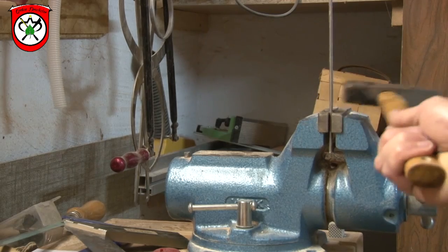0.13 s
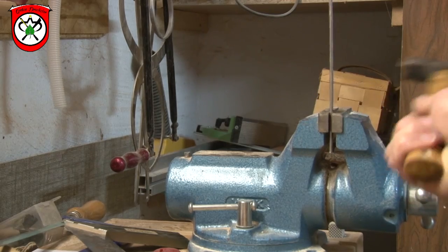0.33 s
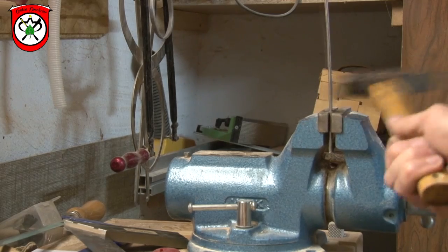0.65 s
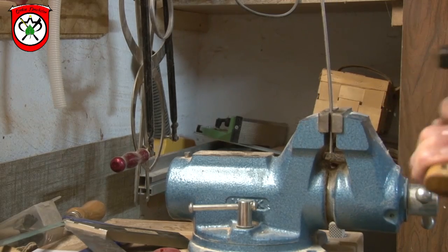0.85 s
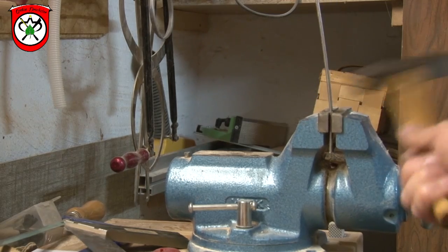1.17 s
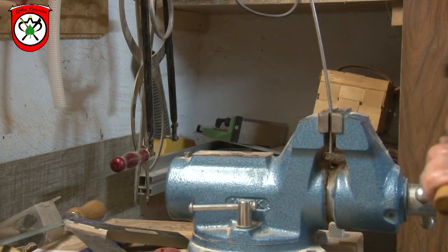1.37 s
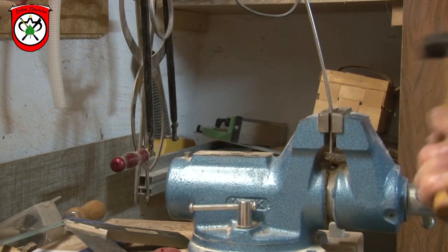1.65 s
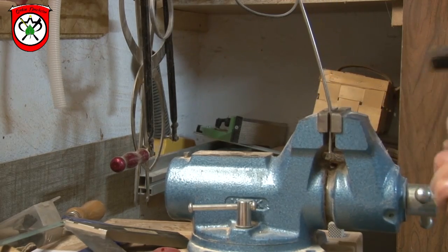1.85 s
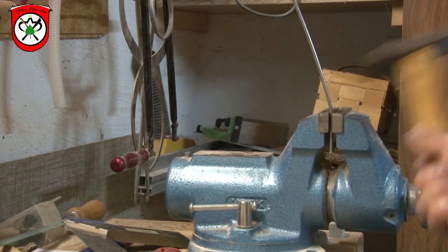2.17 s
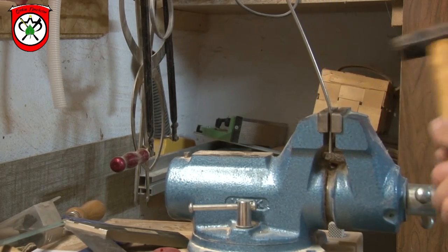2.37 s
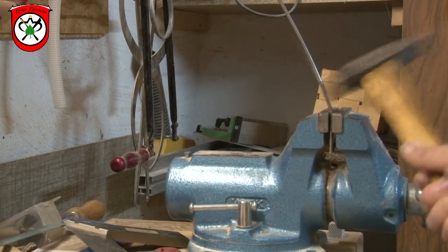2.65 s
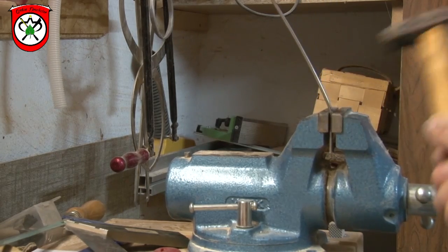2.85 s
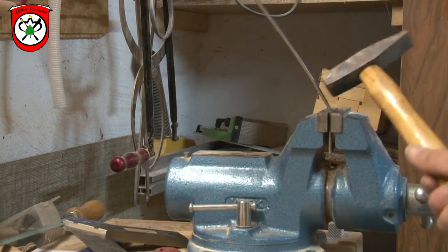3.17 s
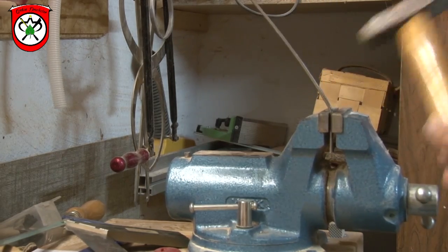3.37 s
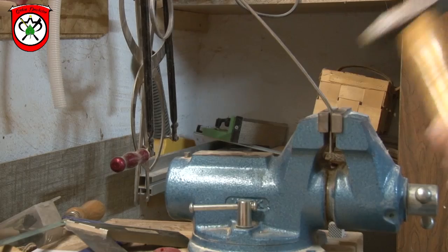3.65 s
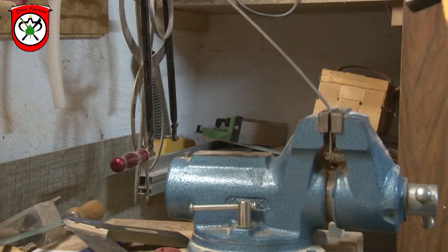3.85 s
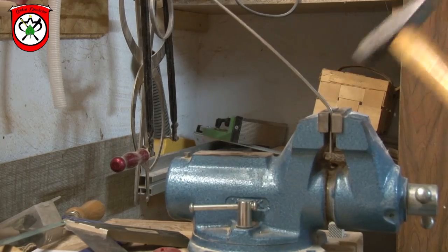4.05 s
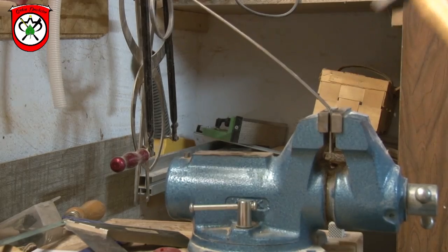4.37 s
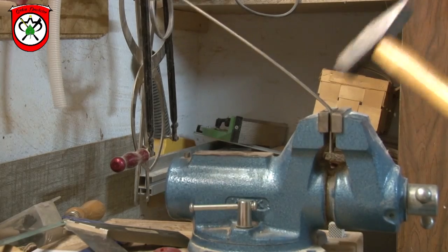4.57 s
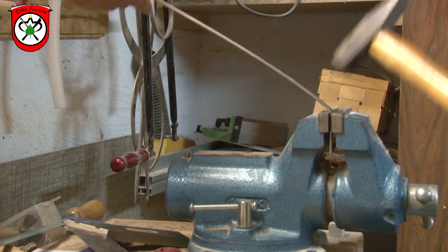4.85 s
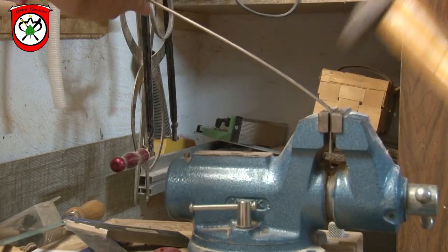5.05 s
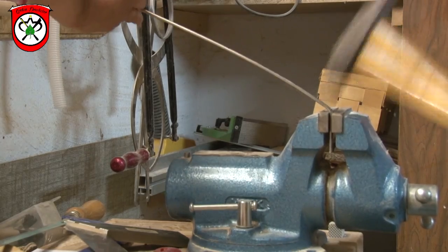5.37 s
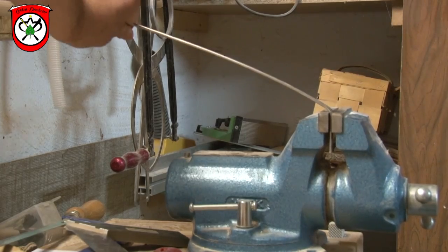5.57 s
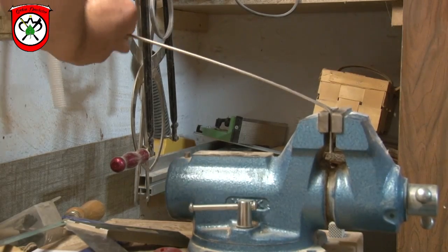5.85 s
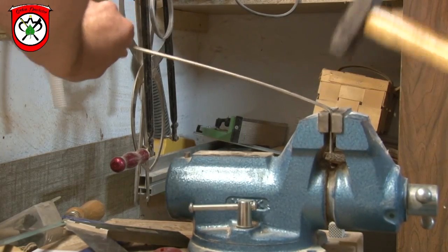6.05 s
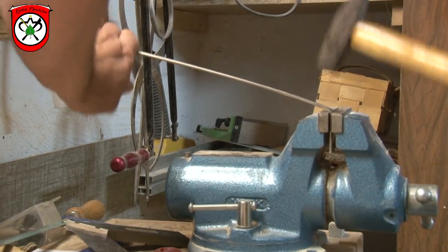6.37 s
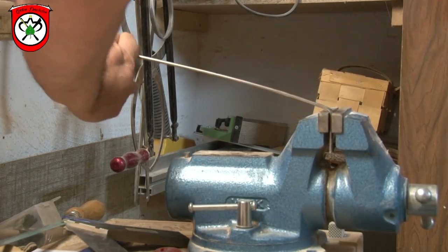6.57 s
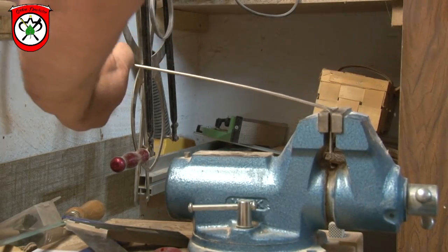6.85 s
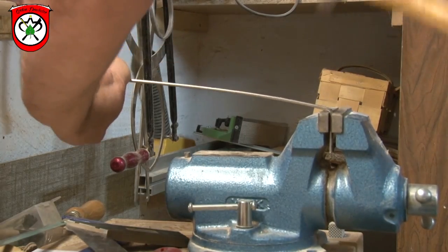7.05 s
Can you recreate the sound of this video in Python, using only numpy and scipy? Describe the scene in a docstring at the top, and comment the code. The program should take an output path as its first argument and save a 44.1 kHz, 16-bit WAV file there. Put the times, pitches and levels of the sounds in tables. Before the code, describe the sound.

A hammer strikes a thin steel rod in a heavy bench vise, sharp even blows with ticks, short pings, solid knocks and rattling tools.

```python
"""In a small workshop, a hammer bends a thin steel rod over the jaws of a bench vise in an even run of blows.
Each blow bends it a few degrees: a steel tick, a short ping of the rod, a knock of vise and bench,
then a rattle of loose tools. Hits are damped modes and coloured noise bursts; tools chatter and clink between.
The first blows land sideways on the free rod, which whips and pings; the last ones come from above
and drive it onto the jaw. Each sound is heard directly and from the walls, over faint room air."""
import sys
import numpy as np
from scipy import signal
from scipy.fft import rfft, irfft, next_fast_len
from scipy.io import wavfile
from scipy.ndimage import uniform_filter1d

SR = 44100
rng = np.random.default_rng(int(sys.argv[2]) if len(sys.argv) > 2 else 0)


def waveform_to_disk(signal):
    """Save audio, clipped to [-1, 1], as 16-bit WAV at the path in sys.argv[1]."""
    frames = np.transpose(np.atleast_2d(signal))
    scaled = np.clip(frames, -1, 1) * 32767
    samples = np.round(scaled).astype(np.int16)
    wavfile.write(sys.argv[1], SR, samples)


N = 318402
AGE = np.arange(next_fast_len(int(.6 * SR))) / SR   # seconds since a hit, over the life of one blow
ATTACK = int(.03 * SR)   # samples over which a hit's loudness is set
BEND_DEG_PER_BLOW = 3.012   # the rod's angle from upright sets the character of the next blow

# hammer blows, levels relative: start_s, weight_db, contact_tick_db, rod_ping_db
BLOWS = [(0.193, -9.5, -26, -37.5), (0.479, -7.5, -24, -38.5), (0.75, -9, -25, -31),
         (1.024, -8.5, -26.5, -32), (1.282, -14, -28, -27.5), (1.55, -11, -26.5, -28),
         (1.805, -15, -26, -27.5), (2.06, -13.5, -26.5, -23.5), (2.291, -13.5, -24.5, -31),
         (2.518, -14, -23.5, -26.5), (2.752, -11.5, -24.5, -26.5), (2.989, -8.5, -23, -31.5),
         (3.24, -12, -22.5, -36.5), (3.506, -13.5, -24.5, -35), (3.78, -9, -22, -42),
         (4.034, -9.5, -22.5, -46), (4.319, -11, -23.5, -38), (4.613, -9, -23, -45),
         (4.887, -8, -22, -40.5), (5.176, -9, -24.5, -43), (5.476, -7, -26, -41), (5.76, -6.5, -26.5, -38),
         (6.077, -9, -28, -38), (6.41, -6, -26.5, -35), (6.735, -5.5, -26.5, -33),
         (7.054, -5.5, -27.5, -34)]
# colour of a bright metallic crack: frequency_hz, relative level_db
CRACK_COLOUR = [(1200, -22), (2200, -7), (2700, 2.5), (3200, -1), (3700, -7.5), (5000, -13.5),
                (9000, -43.5)]


def from_db(db):
    """Decibels to gain."""
    return 10 ** (np.asarray(db) / 20)


def at_hz(points, hz):
    """Read a (frequency, value) table on a log-frequency axis."""
    f, value = np.transpose(points)
    return np.interp(np.log(np.maximum(hz, 1)), np.log(f), value)


def colour(x, points):
    """Filter x by a curve of (frequency_hz, gain_db) points."""
    size = x.shape[-1]
    hz = np.fft.rfftfreq(size, 1 / SR)
    return irfft(rfft(x) * from_db(at_hz(points, hz)), size)


def noise(points, size):
    """Steady coloured noise of rms 1."""
    x = colour(rng.standard_normal(size), points)
    return x / x.std()


def dying(t60):
    """Exponential decay, 60 dB down after t60 seconds, over the life of one blow."""
    return np.exp(-np.log(1000) * AGE / t60)


def unit(x):
    """Scale to rms 1 over the attack."""
    return x / np.sqrt(np.mean(x[:ATTACK] ** 2) + 1e-20)


def even(x):
    """Spectrum of x with its chance peaks levelled: dense modes overlap and favour no narrow band."""
    spectrum = rfft(x)
    local_power = uniform_filter1d(np.abs(spectrum) ** 2, size=21, axis=-1)
    return spectrum / np.sqrt(local_power + 1e-20)


def add(out, s, x):
    """Mix x into out from time s."""
    i = max(int(s * SR), 0)
    out[i:i + len(x)] += x[:max(len(out) - i, 0)]


def struck(modes, scatter_db, contact_s, detune):
    """Damped modes of a struck body; strength and pitch vary at random from hit to hit."""
    out = 0
    for k, (hz, db, t60) in enumerate(modes):
        strength, shift = np.clip(rng.standard_normal(2), -1.5, 1.5)
        polarity = (-1) ** (k // 4)   # flips after every four modes
        wave = polarity * np.sin(2 * np.pi * hz * (1 + detune * shift) * AGE)
        out = out + from_db(db + scatter_db * strength) * wave * dying(t60)
    onset = 1 - np.exp(-AGE / contact_s)
    return unit(out * onset)


def crowd(points, t60, contact_s):
    """Modes too many and too damped to tell apart: a short noise burst, cut off at t60."""
    burst = irfft(even(rng.standard_normal(len(AGE)) * dying(t60)), len(AGE))
    onset = 1 - np.exp(-AGE / contact_s)
    return unit(colour(burst, points) * onset * (AGE < t60))


def room_air():
    """Still air of the room: independent quiet noise in the two channels."""
    # mostly low hush: frequency_hz, relative level_db
    air_colour = [(20, -2), (100, 4.5), (210, 2), (500, -15), (1500, -11.5), (4000, -6), (16000, -36)]
    return from_db(-82) * np.array([noise(air_colour, N), noise(air_colour, N)])


def rod_state(deg):
    """Three shares 0-1 at this angle: how much the rod whips, is hit from above and lies on the jaw."""
    whip = np.exp(-((deg - 18.1) / 17.3) ** 2)   # the free rod whips most around 18 degrees
    # the rod is taken in hand and the blows start to come from above
    overhead = (1 + np.tanh((deg - 56) / 2)) / 2
    # the rod comes to lie on the jaw
    seated = (1 + np.tanh((deg - 69.3) / 2.5)) / 2
    return whip, overhead, seated


def shaking():
    """Gain of the chatter: each blow shakes the bench, most when the rod whips, and it dies away."""
    out = np.zeros(N)
    add(out, 0, from_db(-52) * dying(.16))   # tools still settling at the start
    for k, (s, *_) in enumerate(BLOWS):
        whip, overhead, _ = rod_state(k * BEND_DEG_PER_BLOW)
        level_db = -63 + 14.5 * whip - 11 * overhead
        add(out, s, from_db(level_db) * dying(.96))
    return out


def chatter(per_s, touch_t60):
    """Hanging tools tap against each other while the bench shakes: noise driven by random taps."""
    # colour of the taps: frequency_hz, relative level_db
    chatter_colour = [(100, -17.5), (230, 7), (450, 3.5), (750, 4), (1300, -5), (1800, 0), (2350, -21),
                      (2560, -10.5), (2800, -19), (3700, -25), (7000, -21.5), (14000, -44.5)]
    taps = (rng.random(N) < per_s / SR) * rng.exponential(1, N)
    # energy decays twice as fast in dB as the amplitude taken from it
    energy = np.abs(signal.fftconvolve(taps, dying(touch_t60 / 2))[:N])
    x = colour(rng.standard_normal(N) * np.sqrt(energy), chatter_colour)
    return shaking() * x / x.std()


def clinks(t60):
    """Light metal touches: a tiny click and a few close, quickly damped modes."""
    # loose things touching between the blows: start_s, peak level_db before the echo, nominal pitch_hz
    touches = [(.103, -59, 7500), (.699, -52, 1900), (.968, -56, 1900), (1.503, -48, 1900),
               (1.771, -48, 1900), (1.938, -45, 4200), (2.251, -50, 1700), (2.885, -49, 1800),
               (3.191, -60, 2400), (3.435, -62, 2400), (4.013, -51, 1900)]
    out = np.zeros(N)
    for s, db, hz in touches:
        modes = [(hz * .91, -4, t60), (hz, 0, t60), (hz * 1.1, -6, t60)]
        x = struck(modes, scatter_db=2, contact_s=.002, detune=.005)
        x = x + from_db(-10) * crowd(CRACK_COLOUR, t60=.025, contact_s=.001)
        add(out, s, from_db(db) * x / np.abs(x).max())
    return out


def response(deg, weight_db, tick_db, ping_db):
    """How a blow is shared out: side blows shake bench and tools, blows from above go into the vise."""
    whip, overhead, seated = rod_state(deg)
    return dict(
        buzz_t60=.13 + .056 * whip - .048 * overhead - .035 * seated,
        rocking_db=-16.5 + 2 * whip - 1.5 * overhead,   # relative to the thud
        # the bench follows only a share of the weight
        thud=.61 * weight_db - 20.5 - .0575 * deg - 2 * overhead,
        knock=weight_db - 19.5 + 3.5 * overhead - 3 * seated,
        ring=weight_db - 21 - 3.5 * overhead,
        clack=weight_db - 19 + overhead + 1.5 * seated,
        clank=tick_db - 17 + 5 * overhead,
        ping=ping_db - 6 - 7.5 * overhead,   # the hand on the rod damps it
        tick=tick_db - 7 + 1.67 * overhead,
        loose=-28 - .2617 * deg - 2.5 * overhead)


def steel_contact(tick, ping, clank):
    """Steel meets steel: a bright tick, the high modes of the rod and a clank of the hammer head."""
    # contact tick: frequency_hz, relative level_db
    tick_colour = [(1500, -9), (3500, -11.5), (5000, -2), (6400, 2.5), (8000, -0.5), (9800, -2.5),
                   (11500, 2), (13000, -2), (15000, -16), (17000, -17.5)]
    # rod and jaw plates: pitch_hz, relative level_db, t60_s
    rod = [(6790, -9, .03), (6960, -8, .04), (7910, -10, .05), (8320, -8, .04), (9060, -4, .025),
           (9155, 0, .055)]
    # hammer head: pitch_hz, relative level_db, t60_s
    head = [(4150, -2, .025), (4250, 0, .03), (4360, -2, .03)]
    # jaw plates, with a faint ring of steel tools nearby: pitch_hz, relative level_db, t60_s
    tools = [(1780, -2, .05), (1949, -40, 1.0), (2552, -34, .7), (2650, 4, .06), (2945, -1, .07),
             (3451, -33, .5)]
    out = np.zeros(len(AGE))
    add(out, 0, from_db(tick - 1.5) * crowd(tick_colour, t60=.036, contact_s=.0005))
    add(out, 0, from_db(ping) * struck(rod, scatter_db=1.5, contact_s=.0003, detune=.002))
    add(out, .001, from_db(clank) * struck(head, scatter_db=0, contact_s=.0012, detune=.02))
    add(out, 0, from_db(tick - 14.5) * struck(tools, scatter_db=3, contact_s=.002, detune=.002))
    return out


def vise_knock(buzz_t60, tick, clack, knock, ring):
    """The jaws crack and clack and the heavy vise knocks in dense bursts; its few low modes ring."""
    # clack of the jaws: frequency_hz, relative level_db
    clack_colour = [(120, -49.5), (450, -21), (800, 1), (1200, -4), (1700, -2.5), (2100, -11), (3500, -26),
                    (9000, -45)]
    # low knock of the vise: frequency_hz, relative level_db
    knock_colour = [(50, -53.5), (150, -21.5), (280, -10.5), (450, 3.5), (600, 5), (760, -7), (1100, -22.5),
                    (3000, -54)]
    # vise on its mount: pitch_hz, relative level_db, t60_s
    vise = [(435.4, -15, 0.17), (509, -5.5, 0.1), (585, 10, 0.025), (749.6, -9.5, 0.075), (1176, -2, 0.028)]
    out = np.zeros(len(AGE))
    # the crack grows with both the hardness and the weight of the blow
    crack = (clack + tick) / 2 - 6.5
    add(out, .0005, from_db(crack) * crowd(CRACK_COLOUR, t60=buzz_t60, contact_s=.0026))
    add(out, .0007, from_db(clack - 2) * crowd(clack_colour, t60=buzz_t60, contact_s=.002))
    add(out, .001, from_db(knock) * crowd(knock_colour, t60=buzz_t60, contact_s=.00074))
    add(out, .0015, from_db(ring) * struck(vise, scatter_db=4, contact_s=.016, detune=.03))
    return out


def bench_thud(thud, rocking_db):
    """The wooden top thuds in its low modes while the whole bench rocks lower still."""
    # wooden bench top: pitch_hz, relative level_db, t60_s
    bench = [(172, -15.5, 0.31), (196.1, 3.5, 0.13), (211.9, 1.5, 0.13), (250.5, 5, 0.1),
             (284.1, -4.5, 0.16), (308.7, 0.5, 0.15), (353.6, -5.5, 0.25), (414, -7, 0.067)]
    # the whole bench rocking: pitch_hz, relative level_db, t60_s
    rocking = [(85.7, -11.5, 0.32), (110.9, -2, 0.26), (132.1, -1, 0.19)]
    out = np.zeros(len(AGE))
    add(out, .001, from_db(thud - 2.5) * struck(bench, scatter_db=.5, contact_s=.0078, detune=.025))
    add(out, .001, from_db(thud + rocking_db) * struck(rocking, scatter_db=1.4, contact_s=.001, detune=.034))
    return out


def rattle(flight_s, spread_s, touch_t60, count=30):
    """Loose tools jump with the blow and land in a flurry of small touches."""
    # colour of the landing tools: frequency_hz, relative level_db
    rattle_colour = [(60, -36), (300, -11.5), (700, 14), (1700, 12.5), (2400, 5), (5000, 1), (7000, 1.5),
                     (9500, -6), (12000, -4.5), (16000, -39)]
    energy = np.zeros(len(AGE))
    for when, size in rng.uniform(-.91, 1, (count, 2)):
        add(energy, flight_s + spread_s * when, from_db(4.2 * size) * dying(touch_t60 / 2))
    x = colour(rng.standard_normal(len(AGE)) * np.sqrt(energy), rattle_colour)
    return x / np.sqrt(np.sum(x ** 2) / ATTACK)


def blow(buzz_t60, rocking_db, thud, knock, ring, clack, clank, ping, tick, loose):
    """The steel contact sounds first; vise and bench follow within milliseconds, then loose tools."""
    out = steel_contact(tick, ping, clank)
    out = out + vise_knock(buzz_t60, tick, clack, knock, ring)
    out = out + bench_thud(thud, rocking_db)
    return out + from_db(loose) * rattle(flight_s=.024, spread_s=.018, touch_t60=.057)


def overtones(deg, weight_db):
    """A hanging tool sings while the whipping rod shakes the bench; at the end the rod slaps on the jaw."""
    # hanging steel tool: pitch_hz, relative level_db, t60_s
    hanging_tool = [(2510, 0, .9), (2585, 1, .9), (2945, -7, .7)]
    # rod pressed flat on the jaw: pitch_hz, relative level_db, t60_s
    jaw = [(770, -1, .04), (1055, 2.5, .04), (1184, 1, .04), (1460, -2.5, .03), (1826, -7, .03)]
    whip, _, seated = rod_state(deg)
    chime = from_db(-60.5) * struck(hanging_tool, scatter_db=4, contact_s=.02, detune=.001)
    slap = from_db(weight_db - 19.5) * struck(jaw, scatter_db=1, contact_s=.0013, detune=.027)
    return whip ** 2 * chime + seated * slap


def sparkle(x, top_db):
    """Raise or lower the highest treble: a slope from 8.5 kHz, full from 14 kHz."""
    padded = np.pad(x, ATTACK)   # keeps the filter from wrapping round the ends
    return colour(padded, [(8500, 0), (14000, top_db)])[ATTACK:-ATTACK]


def workshop(x, near, first_s=.0012, build_s=.001):
    """Add the stereo echo of the small room: reflections thicken, then die band by band."""
    # what the walls give back: frequency_hz, level_db
    wall_colour = [(80, -7), (200, -4.5), (500, -10.5), (1000, -7.5), (2000, -5.5), (4500, -4),
                   (7000, -4.5), (10000, -8.5), (15000, -19.5)]
    # how long the room rings: frequency_hz, t60_s
    room_t60 = [(100, .3), (500, .26), (2000, .26), (5000, .23), (9000, .19), (15000, .13)]
    # strength of the sideways reflections: frequency_hz, level_db
    sideways = [(120, -11), (280, -3), (600, -1.5), (1500, 0), (4000, 0), (8000, -7), (14000, -13)]
    size = len(AGE)
    hz = np.fft.rfftfreq(size, 1 / SR)
    centres = np.geomspace(100, 16000, 7)
    white = rfft(rng.standard_normal((2, size)))
    tail = 0
    for centre, one_band in zip(centres, np.eye(len(centres))):
        band = irfft(white * at_hz(np.c_[centres, one_band], hz), size)
        tail = tail + band * dying(at_hz(room_t60, centre))
    swell = 1 - np.exp(-np.maximum(AGE - first_s, 0) / build_s)
    mid, side = irfft(even(tail * swell) * from_db(at_hz(wall_colour, hz)), size)
    side = colour(from_db(-7.5) * side + from_db(-7) * near, sideways)
    walls = np.array([mid + side, mid - side]) * (AGE < .35)
    return x + signal.fftconvolve(x[None], walls, axes=-1)[:, :len(x)]


def hammering(near):
    """The run of blows, each with its own freshly drawn diffuse room echo."""
    out = np.zeros((2, N))
    for k, (s, weight_db, tick_db, ping_db) in enumerate(BLOWS):
        deg = k * BEND_DEG_PER_BLOW
        hit = blow(**response(deg, weight_db, tick_db, ping_db))
        hit = hit + overtones(deg, weight_db)
        # the highest treble dulls as the rod leans over
        hit = sparkle(hit, top_db=.5 - .0458 * deg)
        for channel, x in zip(out, workshop(hit, near)):
            add(channel, s, x)
    return out


def near_reflections():
    """The shelf and the near wall answer within milliseconds: a short, dense burst for the sides."""
    burst = rng.standard_normal(len(AGE)) * dying(.02) * (AGE > .0015)
    return irfft(even(burst), len(AGE))


def scene():
    """Everything on the bench, heard directly and from the walls, over still room air."""
    near = near_reflections()
    touches = clinks(t60=.03) + chatter(per_s=400, touch_t60=.05)
    air = room_air()
    return hammering(near) + workshop(touches, near) + air


def record(dry):
    """The two microphones differ a little in colour; deep bass and the top are cut."""
    # microphone pair: frequency_hz, left_minus_right_db
    balance = [(60, -6.5), (170, 0.8), (350, -1.5), (700, 0.5), (1400, 0.5), (2800, 1), (5600, 0.8),
               (12000, 0.2)]
    pair = []
    for x, sign in zip(dry, (1, -1)):
        pair.append(colour(x, [(hz, sign * db / 2) for hz, db in balance]))
    bass_cut = signal.butter(2, 103, "high", fs=SR, output="sos")
    top_cut = signal.ellip(10, .1, 90, 16300, fs=SR, output="sos")
    return signal.sosfilt(top_cut, signal.sosfilt(bass_cut, pair))


dry = scene()
out = record(dry)
waveform_to_disk(out)
```